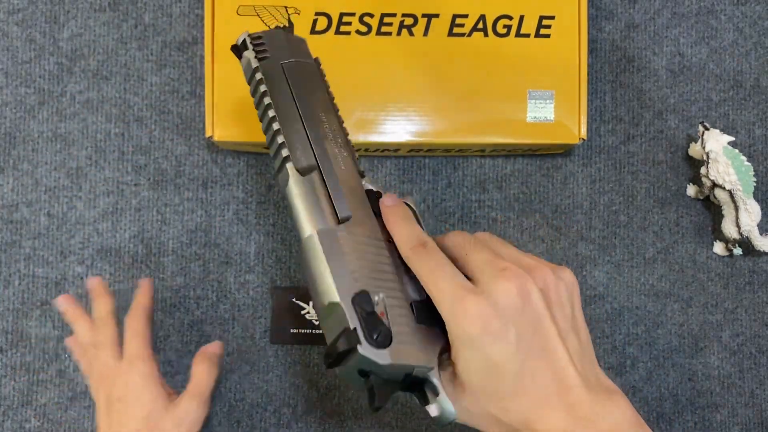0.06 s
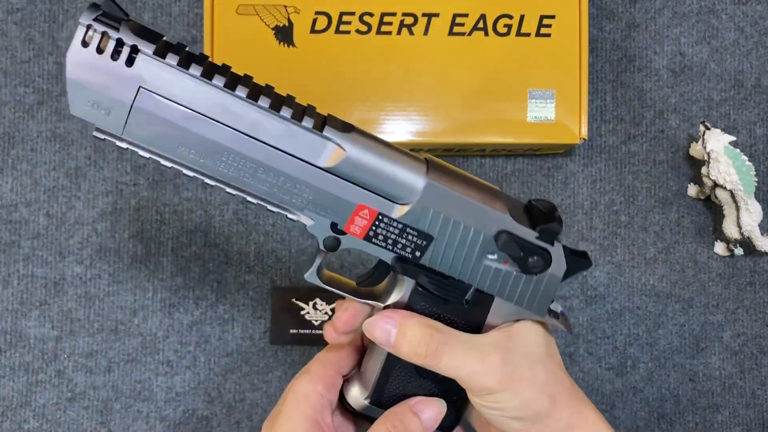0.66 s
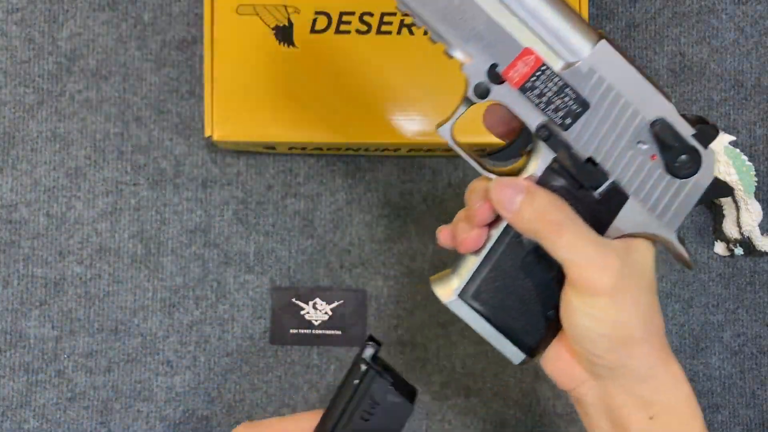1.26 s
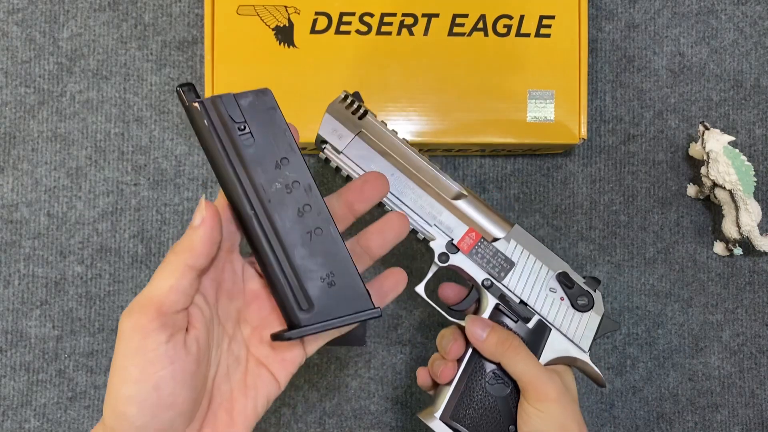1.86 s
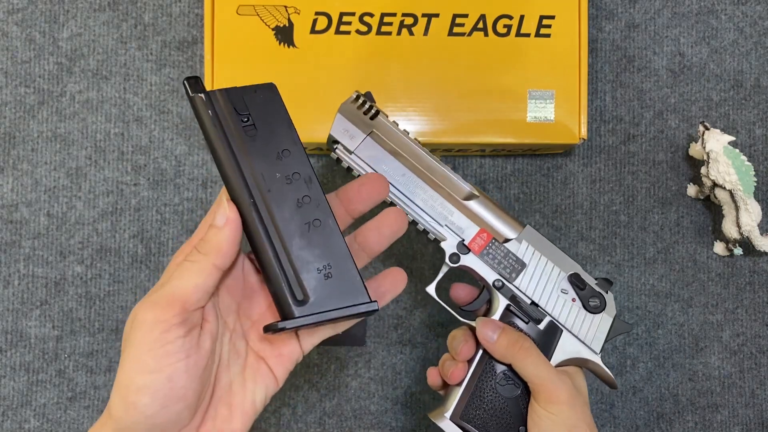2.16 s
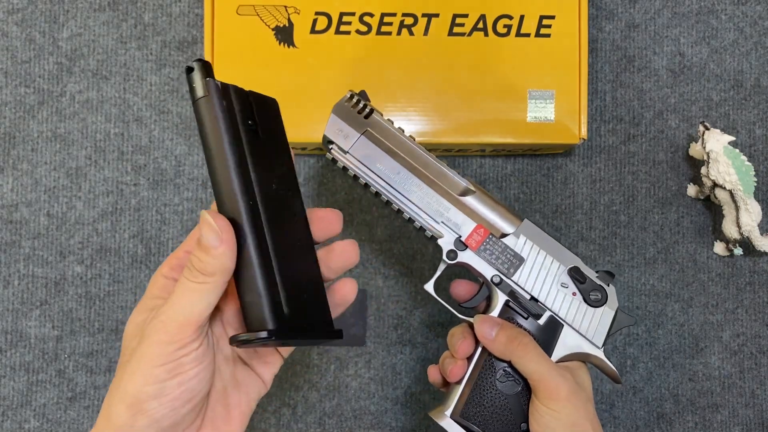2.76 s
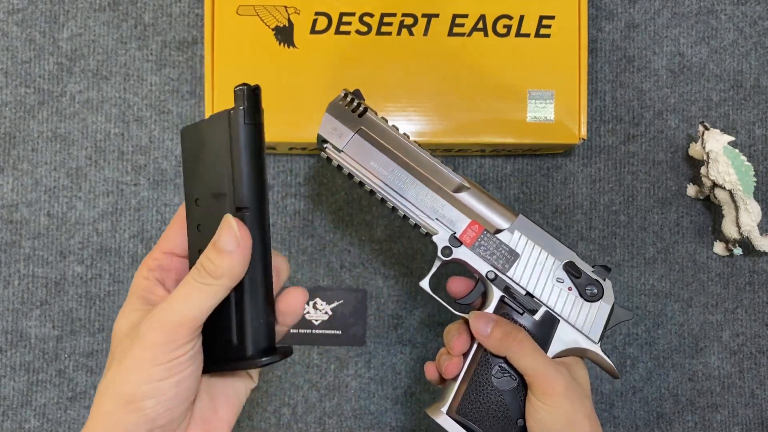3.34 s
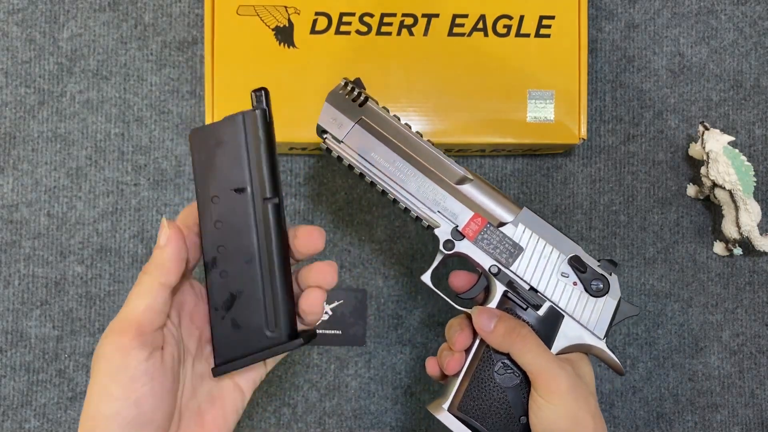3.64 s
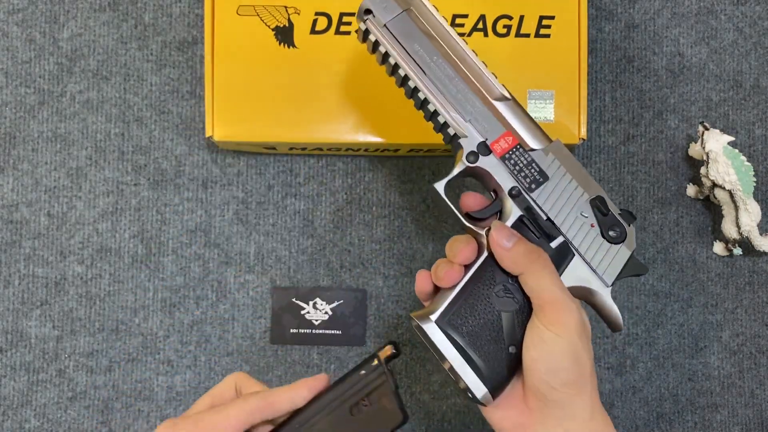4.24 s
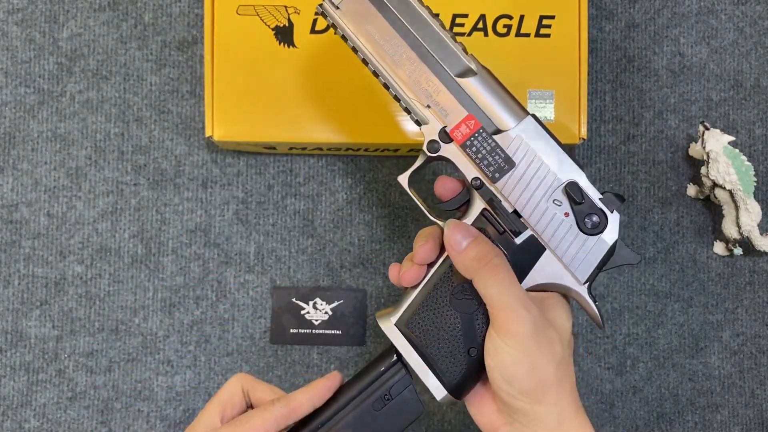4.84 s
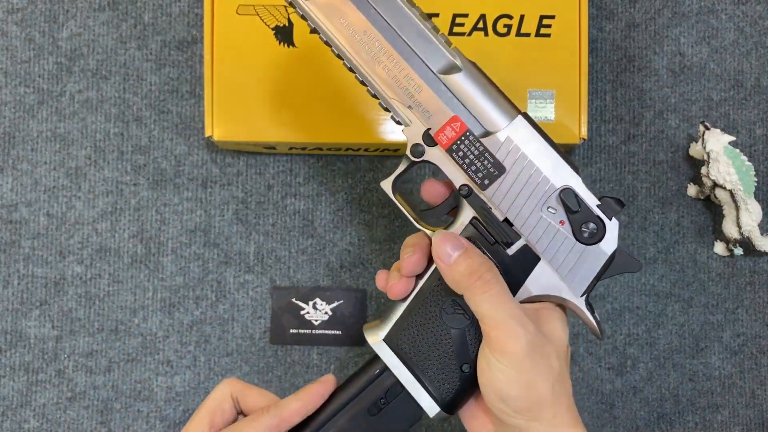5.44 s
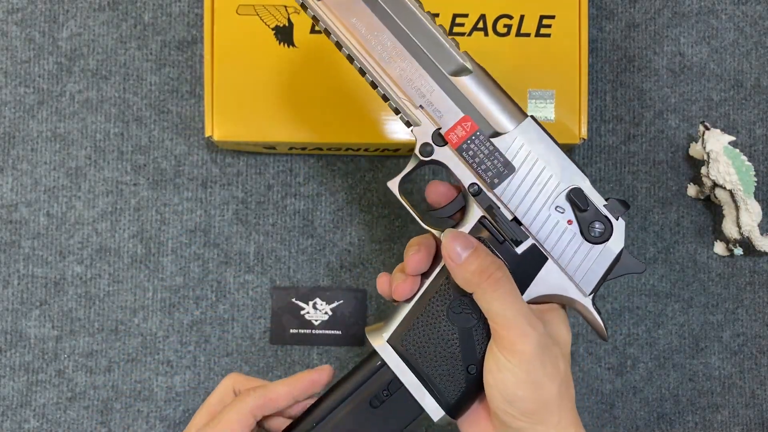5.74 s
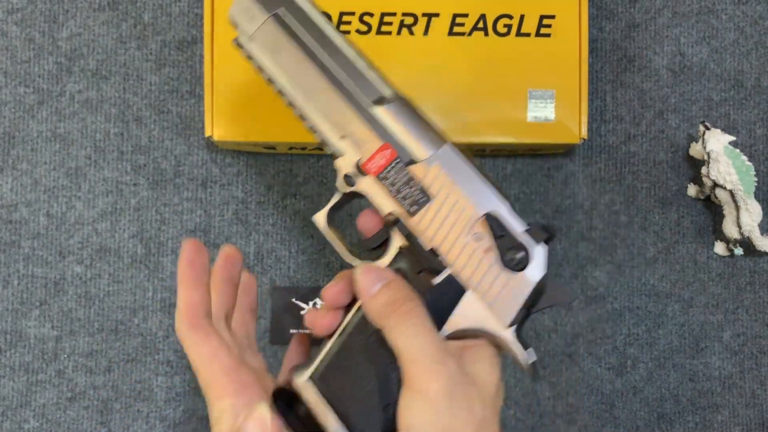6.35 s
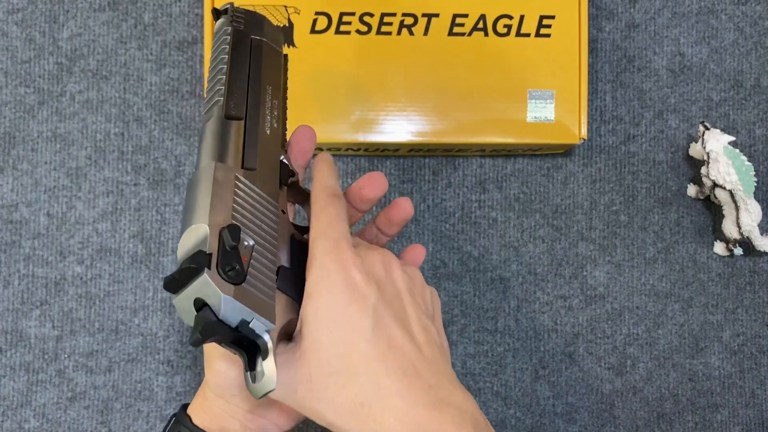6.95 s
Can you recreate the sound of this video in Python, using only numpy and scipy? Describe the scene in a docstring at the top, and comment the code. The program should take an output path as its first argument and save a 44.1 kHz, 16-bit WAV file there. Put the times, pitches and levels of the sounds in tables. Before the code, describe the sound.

A low room rumble with a faint hum runs throughout, rising slightly before 2 seconds. After a few faint clicks, an airsoft pistol's catch snaps at about 0.9 seconds with a small spring ping, and the metal magazine scrapes and rattles out of the grip until 1.3. A light tick follows at 1.4. From 2.7 to 4.5 seconds come sparse, quiet ticks and soft finger brushes as the magazine is handled, with a brighter ringing click near 4. At 5.5 it knocks against the opening and scrapes briefly. From 6.1 it slides in with small knocks and a swelling metallic grind, then locks at about 6.4 with a sharp double clack and a dull palm thump, by far the loudest moment. A few lighter clicks follow between 6.6 and 6.9. Everything sounds close, with a short small-room echo on each click.

```python
"""Sharp metal clicks and scrapes over a low room rumble: an airsoft pistol is unloaded and reloaded.
The catch snaps, the magazine scrapes out of the grip and ticks in the hand, then taps the well, slides in,
strikes the catch and is slapped home. Blows ring the frame, barrel, magazine and a small spring; sliding
metal grinds and hisses through dense tiny slips. A small room answers every click."""
import sys
import numpy as np
from scipy import signal
from scipy.fft import rfft, irfft, next_fast_len
from scipy.io import wavfile
from scipy.ndimage import map_coordinates

SR = 44100
rng = np.random.default_rng(int(sys.argv[2]) if len(sys.argv) > 2 else 0)


def to_wav(sig):
    """Store sig (one row per channel, or 1-D mono) as 16-bit WAV at the path in sys.argv[1].

    Samples outside -1..1 are clipped; the rate is SR.
    """
    pcm = np.clip(np.atleast_2d(sig), -1, 1) * 32767
    pcm = np.round(pcm).astype(np.int16)
    wavfile.write(sys.argv[1], SR, pcm.T)  # frames by channels


N = 317564


def amp(db):
    return 10 ** (np.asarray(db) / 20)


def unit_rms(x):
    return x / np.sqrt(np.mean(x ** 2) + 1e-20)


def curve_at(points, hz):
    """Interpolate (freq_hz, value) points on a log axis."""
    freq_hz, value = np.transpose(points)
    return np.interp(np.log(hz + 1), np.log(freq_hz + 1), value)


def wobble(rate_hz):
    """Smooth random curve."""
    knots = rng.standard_normal(int(N * rate_hz / SR) + 4)
    return map_coordinates(knots, [np.arange(N) * rate_hz / SR])


def filtered(x, response):
    """Apply response(hz) by FFT."""
    size = next_fast_len(N + SR // 2)
    return irfft(rfft(x, size) * response(np.fft.rfftfreq(size, 1 / SR)), size)[..., :N]


def bandpass(x, low_hz, high_hz, order=4):
    return signal.sosfilt(signal.butter(order, [low_hz, high_hz], "band", fs=SR, output="sos"), x)


def resonances(modes, hz):
    """Summed complex response of resonators."""
    return sum(amp(db) * 1j * hz * width_hz / (pitch_hz ** 2 - hz ** 2 + 1j * hz * width_hz)
               for pitch_hz, width_hz, db in modes)


def add(track, start_s, sound):
    part = track[..., round(start_s * SR):][..., :sound.shape[-1]]
    part += sound[..., :part.shape[-1]]


# Rumble spectrum: freq_hz, level_db
RUMBLE_SPECTRUM = [(15, -39.5), (28, -18.5), (55, -2), (140, -1.5), (194, -10.5), (337, -13.5),
                   (482, -20.5), (720, -22), (1580, -33), (2500, -37), (4300, -45.5), (5000, -55.5),
                   (8000, -60), (16000, -69)]
# Rumble envelope: time_s, level_db
RUMBLE_ENVELOPE = [(0, -56.5), (1.55, -57), (1.8, -52.7), (3.5, -52), (5.9, -52), (7.2, -50.5)]
# Left-right likeness of the rumble: freq_hz, coherence
RUMBLE_COHERENCE = [(100, 1), (250, .88), (600, 0.21), (2000, 0.18), (10000, 0.15)]
# Hum partials: pitch_hz, level_db
HUM_PARTIALS = [(47, -64.5), (69, -58), (103, -59), (139, -62), (342, -67.5), (701, -74.5), (1300, -81.5),
                (2390, -84.5), (3400, -92), (4400, -95)]


def rumble(dip_s=6.53, dip_width_s=.045, dip_db=15):
    """Low room noise and wavering hum; both step up early and dip briefly after the final clack."""
    def mid_side_gain(hz):
        angle = np.arccos(np.clip(curve_at(RUMBLE_COHERENCE, hz), -1, 1)) / 2
        return amp(curve_at(RUMBLE_SPECTRUM, hz)) * [np.cos(angle), np.sin(angle)]

    t = np.arange(N) / SR
    mid, side = filtered(rng.standard_normal((2, N)), mid_side_gain)
    level_db = np.interp(t, *np.transpose(RUMBLE_ENVELOPE))
    level_db -= dip_db * np.exp(-((t - dip_s) / dip_width_s) ** 2)
    hum = sum(amp(db + 1.4 * wobble(5)) * np.sin(2 * np.pi * hz * t + 1.3 * wobble(7))
              for hz, db in HUM_PARTIALS)
    noise = amp(level_db + 1) * unit_rms(np.array([mid + side, mid - side]))
    return (noise + amp(level_db - np.median(level_db)) * hum) * amp([[-.8], [.8]])


# Room tail decay: freq_hz, t60_s
TAIL_DECAY = [(200, 0.1), (900, 0.85), (2000, 0.92), (5500, 0.7), (9000, 0.61), (12000, 0.62),
              (15000, 1.07)]
# Echo spectrum: freq_hz, gain_db
ECHO_SPECTRUM = [(100, -15), (600, -7), (900, -4), (1350, -3), (1950, -2), (2700, -3.5), (4500, -1.5),
                 (6500, -2.5), (9500, -3), (12000, -5), (13200, -35.5), (14500, -55)]


def room(x, early_db=-14, early_t60_s=.12, late_db=-14):
    """Quick echoes from table and walls, then a tail; fresh noise every 0.2 s keeps the tail smooth."""
    def decaying(spectra, t, t60_s):
        echoes = signal.istft(spectra * amp(-60 * t / t60_s), SR, nperseg=256)[1]
        return echoes / np.linalg.norm(echoes[0])

    wet, step = np.zeros((2, N)), SR // 5
    for start in range(0, N - step, step):
        hz, t, spectra = signal.stft(rng.standard_normal((3, SR)), SR, nperseg=256)
        early = amp(early_db) * decaying(spectra, t, early_t60_s)
        late = amp(late_db) * decaying(spectra, t, curve_at(TAIL_DECAY, hz)[:, None])
        common, *per_side = early + late
        response = (common + np.array(per_side)) / np.sqrt(2)
        add(wet, start / SR + .004, signal.fftconvolve(x[None, start:start + step], response, axes=1))
    return filtered(wet, lambda hz: amp(curve_at(ECHO_SPECTRUM, hz)))


# Finger and metal brushes: start_s, length_s, level_db, centre_hz, width_octaves
BRUSHES = [(3.244, .063, -67.5, 4400, 0.26), (3.38, .27, -83.5, 10800, 0.26), (3.708, 0.1, -67, 3600, .32),
           (3.711, .06, -79.5, 9100, .4), (4.439, 0.091, -62, 2000, .92), (4.437, .08, -70, 7500, 0.94),
           (5.635, .045, -61, 3580, .2)]


def fingers():
    """Light brushing along the magazine makes soft swishes."""
    out = np.zeros(N)
    for start_s, length_s, db, centre_hz, width_octaves in BRUSHES:
        n = round(length_s * SR)
        distance = np.log2((np.fft.rfftfreq(n, 1 / SR) + 1) / centre_hz) / width_octaves
        swish = unit_rms(irfft(rfft(rng.standard_normal(n)) * np.exp(-distance ** 2 / 2), n))
        envelope = np.sin(np.pi * np.sqrt(np.arange(n) / n))
        add(out, start_s, amp(db) * swish * envelope)
    return out


# Clicks that excite the spring: start_s, level_db
SPRING_HITS = [(.903, -49), (3.95, -49), (6.85, -55)]
# Spring modes: pitch_hz, level_db, t60_s
SPRING_MODES = [(3000, -12, .15), (5320, -17, .14), (6720, -9, .19), (7000, -3, .21)]


def spring_pings(detune=.018, partials=14):
    """A small undamped steel spring rings on, each mode a cluster of close partials."""
    out, t = np.zeros(N), np.arange(SR // 2) / SR
    for start_s, hit_db in SPRING_HITS:
        for hz, mode_db, t60_s in SPRING_MODES:
            offset, phase = rng.standard_normal((2, partials, 1))
            cluster = unit_rms(np.sin(2 * np.pi * (hz * (1 + detune * offset) * t + phase)).sum(0))
            add(out, start_s, amp(hit_db + mode_db - 60 * t / t60_s) * cluster)
    return out


def slips(rate_hz, spread_db, chatter_db):
    """Tiny slips of uneven size, bunched as the magazine chatters against the walls."""
    train = (rng.random(N) < rate_hz / SR) * rng.choice([-1, 1], N)
    sizes = amp(spread_db * rng.standard_normal(N))
    return train * sizes * amp(chatter_db * wobble(170))


def stroke_gain(start_s, length_s, mid_db, swell_db, attack_s=.018, release_db_per_s=500):
    """A stroke takes hold, swells or fades with its speed, and lets go."""
    t = np.arange(N) / SR - start_s
    moving_db = swell_db * (np.clip(t / length_s, 0, 1) - .5)
    release_db = release_db_per_s * np.clip(t - length_s, 0, 1)
    return np.clip(t / attack_s, 0, 1) * amp(mid_db + moving_db - release_db)


# Magazine strokes: start_s, length_s, grind_db, hiss_db, swell_db, well_pitch_ratio
SLIDE_STROKES = [(.915, 0.092, -48.5, -58, -1.5, 1.35), (1.003, .1, -49, -52.5, -5, 1.2),
                 (1.11, .095, -48, -49, -.5, 1.1), (5.535, 0.18, -57, -73.5, -11, 0.99),
                 (6.075, .09, -47.5, -73.5, -20, .98), (6.18, 0.18, -45, -53, 13.5, 0.99),
                 (6.357, .055, -35, -38.5, 0, 1.25)]
# Friction spectra: freq_hz, level_db
GRIND_SPECTRUM = [(150, -39), (350, -7.5), (470, -8.5), (650, -16), (900, -8.5), (1100, -5), (1400, -3.5),
                  (1950, -0.5), (2450, -4.5), (3400, -9), (4500, -12.5), (7000, -48)]
HISS_SPECTRUM = [(2000, -41.5), (3300, -3), (4800, -3.5), (6000, 1.5), (7500, -.5), (9300, 1.5),
                 (11000, -1.5), (12000, -7), (13300, -29), (16000, -45.5)]
# Resonances of the hollow well and the magazine walls: pitch_hz, width_hz, gain_db
WELL_MODES = [(890, 63, 2), (1390, 97, 7), (1930, 100, 8.5), (3330, 150, 1.5)]
WALL_MODES = [(3300, 160, -1), (5550, 180, 4), (6050, 180, 2), (7000, 200, 1), (8700, 240, 5),
              (9600, 240, 2)]


def scrape(shift_db=4.5, shift_rate_hz=16, hiss_swell_ratio=1.7):
    """The well grinds, tuned by how the magazine sits; hissing wall modes vary as the contact travels."""
    coarse = slips(rate_hz=1300, spread_db=2, chatter_db=1.5)
    fine = slips(rate_hz=1400, spread_db=2.5, chatter_db=1.6)
    grind, hiss_gain, singing = np.zeros((3, N))
    for start_s, length_s, grind_db, hiss_db, swell_db, pitch_ratio in SLIDE_STROKES:
        hollow = filtered(coarse, lambda hz: amp(curve_at(GRIND_SPECTRUM, hz))
                          * (1 + resonances(WELL_MODES, hz / pitch_ratio)))
        grind += stroke_gain(start_s, length_s, grind_db, swell_db) * unit_rms(hollow)
        hiss_gain += stroke_gain(start_s, length_s, hiss_db, hiss_swell_ratio * swell_db)
    for mode in WALL_MODES:
        mode_gain = amp(shift_db * np.tanh(wobble(shift_rate_hz)))
        singing += mode_gain * filtered(fine, lambda hz: resonances([mode], hz))
    hiss = filtered(fine + singing, lambda hz: amp(curve_at(HISS_SPECTRUM, hz)))
    return grind + hiss_gain * unit_rms(hiss)


# Knock, clack, clink and tick bands of a blow: low_hz, high_hz
BANDS = [(650, 2100), (2100, 4500), (4500, 8000), (8000, 14500)]


def blows(contacts, modes, favour_db, favour_octaves, detune, damping, crack_t60_s, crack_db, stereo):
    """Each contact (start_s, favoured_hz, one level_db per band) is a crack plus hand-damped modes."""
    def unit_onset(x):
        return x * np.sqrt((SR // 200) / np.sum(x ** 2, -1, keepdims=True))  # energy of 5 ms at rms 1

    out, t = np.zeros((2, N)), np.arange(SR // 10) / SR
    hz, width_hz, mode_db = np.transpose(modes)[:, :, None]
    envelope = np.exp(-np.pi * damping * width_hz * t) * (1 - np.exp(-t * hz / 2))
    for start_s, favoured_hz, *band_db in contacts:
        # the contact point favours modes near one pitch
        contact_db = favour_db * np.exp(-(np.log2(hz / favoured_hz) / favour_octaves) ** 2)
        offset, scatter_db, phase = rng.standard_normal((3, len(hz), 1))
        # a hard, brief contact hardly moves the lowest mode
        thinning_db = 1.2 * np.clip(band_db[1] - band_db[0] + 8, -4, 8) * (hz == hz.min())
        gain = width_hz * amp(mode_db + contact_db + scatter_db - thinning_db)
        partials = np.sin(2 * np.pi * (hz * (1 + detune * offset) * t + phase))
        ring = np.sum(gain * envelope * partials, 0)
        noise = rng.standard_normal((3, len(t))) * amp(-60 * t / crack_t60_s)
        crack = noise[0] + stereo * noise[1:]
        for edges_hz, db in zip(BANDS, band_db):
            band_ring = unit_onset(bandpass(ring, *edges_hz))
            band_crack = amp(crack_db) * unit_onset(bandpass(crack, *edges_hz))
            add(out, start_s, amp(db) * unit_onset(band_ring + band_crack))
    return out


def diffuse_bursts(contacts, t60_s=.035):
    """What blows send to the walls: over all directions the modes even out into a smooth burst."""
    out, n = np.zeros(N), SR // 10
    hz = np.fft.rfftfreq(n, 1 / SR)
    low_hz, high_hz = np.transpose(BANDS)
    for start_s, _, *band_db in contacts:
        density_db = np.array(band_db) - 10 * np.log10(2 * (high_hz - low_hz) / SR)
        colour = np.transpose([np.sqrt(low_hz * high_hz), density_db])
        spectrum = rfft(rng.standard_normal(n) * amp(-60 * np.arange(n) / SR / t60_s))
        burst = irfft(spectrum / np.abs(spectrum) * amp(curve_at(colour, hz)), n)
        add(out, start_s, np.sqrt(SR / 200) * burst[:n // 2])
    return out


# Light strikes: start_s, level_db, hardness_db_per_band, favoured_hz
MAGAZINE_TICKS = [(1.391, -45.5, -1, 5320), (1.866, -73, 2, 5700), (2.699, -56.5, -2.5, 2550),
                  (3.218, -54, -4.5, 5300), (3.229, -60, -13, 3000), (3.26, -51.5, -1, 4400),
                  (3.285, -62, -15, 2900), (3.949, -43.5, 1.5, 6950), (4.098, -59, -9.5, 2550),
                  (4.485, -57, -3, 3700), (6.851, -46, -6, 2200)]  # loose parts in the magazine
FRAME_CLICKS = [(.03, -58, -12, 2300), (.608, -62.5, -3.5, 3000), (.65, -67.5, -.5, 6000),
                (.938, -42.5, 0, 3000), (1.002, -40.5, -1.5, 3400), (1.235, -42.5, -3, 2800),
                (5.662, -56.5, -4.5, 3500), (6.351, -38.5, 2.5, 6500), (6.3657, -24.5, 2, 2700),
                (6.4192, -22, -4.5, 2200), (6.4224, -16.5, .5, 2800), (6.4255, -15, -.5, 3300),
                (6.4283, -21.5, -4.5, 2500), (6.603, -42.5, -4.5, 2900)]  # the gun's loose parts and chattering catch


def click_contacts(clicks, balance_db):
    """A light part strikes once; the harder the contact, the more treble."""
    bands_above_clack = np.maximum(np.arange(len(BANDS)) - 1, 0)
    return [(start_s, favoured_hz, *(db + np.array(balance_db) + hardness_db * bands_above_clack))
            for start_s, db, hardness_db, favoured_hz in clicks]


# Magazine modes: pitch_hz, width_hz, level_db
MAGAZINE_MODES = [(2200, 135, 0.5), (2570, 150, -6), (2950, 250, 1.5), (4200, 280, -7), (4650, 300, -10),
                  (5320, 160, -4), (6050, 200, -9), (6950, 220, -4), (8450, 150, -13), (10300, 340, -12)]


def magazine_ticks(contacts):
    """Loose parts ring the same magazine, each from its own contact point."""
    return blows(contacts, MAGAZINE_MODES, favour_db=13.5, favour_octaves=.13, detune=.012,
                 damping=.84, crack_t60_s=.015, crack_db=-10, stereo=.58)


def palm_thump(start_s=6.4302, level_db=-20, sweep_hz=250, end_hz=45, fall_s=.0055, t60_s=.115):
    """The palm drives the magazine home: a soft thump sinking in pitch."""
    out, t = np.zeros(N), np.arange(SR // 4) / SR
    hz = end_hz + sweep_hz * np.exp(-t / fall_s)
    add(out, start_s, amp(level_db - 60 * t / t60_s) * np.sin(2 * np.pi * np.cumsum(hz) / SR))
    return out


def recoil(contacts, gain_db=-15, t60_s=.018, stereo=.95):
    """The gun jerks in the hand under each blow: a dull thud, louder on the right."""
    out, t = np.zeros((2, N)), np.arange(SR // 10) / SR
    for start_s, _, knock_db, clack_db, *_ in contacts:
        noise = rng.standard_normal((3, len(t))) * amp(-60 * t / t60_s)
        thud = bandpass(noise[0] + stereo * noise[1:], 230, 520, order=2)
        onset_rms = np.sqrt(np.mean(thud[:, :SR // 200] ** 2))
        force = np.hypot(amp(knock_db), amp(clack_db - 1))
        add(out, start_s, amp(gain_db) * force * thud / onset_rms)
    return out * amp([[-2], [1.5]])


# Free modes of slide and barrel: pitch_hz, width_hz, gain_db
BARREL_MODES = [(377, 94, -10.5), (825, 39, -8), (1004, 6, -5), (1300, 48, -8), (1740, 24, -20),
                (1900, 22, -15.5), (2270, 32, -13), (2896, 50, -8), (5950, 85, -16), (8630, 150, -8)]


def barrel_ring(frame):
    """Slide and barrel ring in sympathy with the frame."""
    return filtered(frame, lambda hz: resonances(BARREL_MODES, hz))


# Radiation of the gun body: freq_hz, gain_db
BODY_SPECTRUM = [(200, -18), (600, -7), (1100, -7), (1500, -2.5), (1930, 5.5), (2250, -.5), (2600, -3),
                 (3400, -2.5), (6000, 1), (11000, 0)]


def body_radiation(contacts):
    """The body radiates one band best into the room."""
    return filtered(diffuse_bursts(contacts), lambda hz: amp(curve_at(BODY_SPECTRUM, hz)))


# Knocks of the magazine on the gun, and of the palm meeting the magazine at 4.442 s: # start_s, level_db,
# hardness_db_per_band, first_flight_s, rebound_loss_db, favoured_hz
KNOCKS = [(.844, -53.5, -8, .003, 12, 1950), (.903, -38, 3, .004, 1, 6400),
          (.932, -42.5, 1.4, .006, 7.5, 1700), (1.007, -36.5, -6, .005, 11, 2000),
          (1.12, -49.5, -1, .004, 6, 5800), (1.182, -45, -7, .005, 13, 1600),
          (4.442, -54, -2.5, .021, 11, 1100), (5.52, -36, -11, .005, 12, 1150),
          (5.534, -32, -4, .004, 9, 1700), (5.603, -47, -9, .005, 8, 1100),
          (5.6695, -37.5, -13.5, .016, 13.5, 1500), (6.065, -27.5, -4.5, .009, -.5, 1950),
          (6.223, -47, -8, .006, 3, 1900), (6.256, -43, -6.5, .005, 9, 1900),
          (6.284, -34.5, -10, .008, 0, 1400), (6.316, -35, -8, .004, 12, 1800),
          (6.338, -28, -8.5, .005, 2.5, 1600), (6.3672, -11.5, -3, .002, 18, 1450),
          (6.645, -36, -6.5, .003, 16, 1950)]


def knock_contacts(balance_db=(0, -1.44, -4.2, -1.6), flight_ratio=.65, soften_db=2.5):
    """Each knock lands on an edge and rebounds twice: sooner, duller and mostly weaker."""
    contacts = []
    for time_s, db, hardness_db, flight_s, loss_db, favoured_hz in KNOCKS:
        for bounce in range(3):
            tilt_db = (hardness_db - bounce * soften_db) * np.arange(len(BANDS))
            band_db = db - bounce * loss_db + np.array(balance_db) + tilt_db
            contacts.append((time_s, favoured_hz, *band_db))
            time_s += flight_s * flight_ratio ** bounce
    return contacts


# Modes of the grip frame with the magazine: pitch_hz, width_hz, level_db
FRAME_MODES = [(850, 150, -3.5), (1350, 130, .5), (1680, 150, -3), (1920, 150, -3), (2420, 220, -8),
               (2740, 130, -8), (3060, 140, -11), (3420, 160, -11), (4580, 450, -20), (5850, 160, -7),
               (6550, 200, -8.5), (7940, 160, -20), (9100, 180, -19), (10300, 250, -21)]


def frame_blows(contacts, open_from_s=1.25, open_until_s=6.39, mute_db=11):
    """Blows ring the frame; its lowest mode, the hollow well's, is muted while the magazine fills it."""
    (well_hz, width_hz, db), *higher = FRAME_MODES
    muted_modes = [(well_hz, width_hz, db - mute_db), *higher]
    while_open = [hit for hit in contacts if open_from_s < hit[0] < open_until_s]
    while_filled = [hit for hit in contacts if hit not in while_open]
    strike = dict(favour_db=6, favour_octaves=.2, detune=.014, damping=1.1,
                  crack_t60_s=.012, crack_db=-3, stereo=.59)
    return blows(while_open, FRAME_MODES, **strike) + blows(while_filled, muted_modes, **strike)


def microphone_ports(pair, lag_s=3.8e-5, cavity_hz=4750, width_hz=1200):
    """The right port hears the gun later; its cavity turns the phase around one resonance."""
    def phase_turn(hz):
        cavity_rad = 2 * np.arctan2(width_hz * hz, cavity_hz ** 2 - hz ** 2)
        return np.exp(-1j * (2 * np.pi * hz * lag_s + cavity_rad))

    return np.array([pair[0], filtered(pair[1], phase_turn)])


def scene():
    """Direct gun sound, room echoes and rumble, in stereo."""
    on_frame = knock_contacts() + click_contacts(FRAME_CLICKS, balance_db=(-12.5, .5, -5.5, 0))
    in_magazine = click_contacts(MAGAZINE_TICKS, balance_db=(-11, -.5, -2, -6.5))
    scraping = scrape()
    ticking = magazine_ticks(in_magazine)
    frame = amp(-1.5) * frame_blows(on_frame) + recoil(on_frame) + scraping
    spring = spring_pings()
    hands = fingers() + palm_thump()
    direct = frame + amp(2.5) * barrel_ring(frame) + ticking + spring + hands
    radiated = amp(.16) * body_radiation(on_frame) + amp(.5) * diffuse_bursts(in_magazine)
    ringing = amp(-7) * (ticking.mean(0) + spring)
    echoes = room(radiated + ringing + scraping + hands)
    return microphone_ports(direct + echoes) + rumble()


def record(dry, knee_db=-23, memory_s=.31, ceiling=.91, cutoff_hz=16000):
    """Gain control backs off after loud blows; soft clipping and a low-pass follow."""
    pole = np.exp(-1 / (memory_s * SR))
    power = signal.lfilter([1 - pole], [1, -pole], np.mean(dry ** 2, 0))
    eased = dry / np.sqrt(1 + power / amp(knee_db) ** 2)
    rounded = eased / (1 + np.abs(eased / ceiling) ** 6) ** (1 / 6)
    return filtered(rounded, lambda hz: np.clip((cutoff_hz - hz) / 400 + .5, 0, 1))


dry = scene()
out = record(dry)
to_wav(out)
```